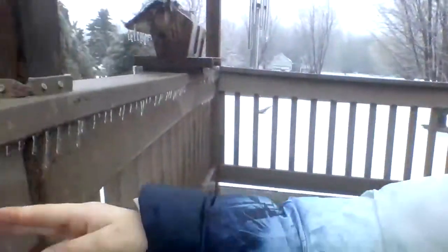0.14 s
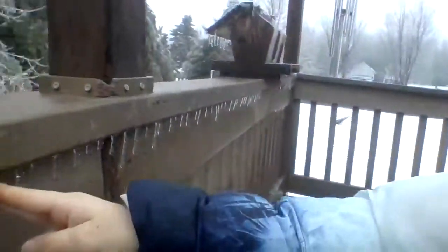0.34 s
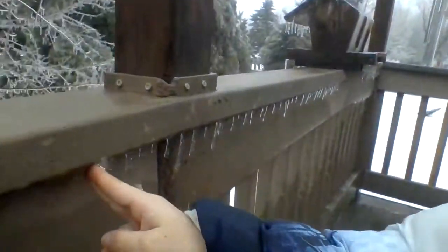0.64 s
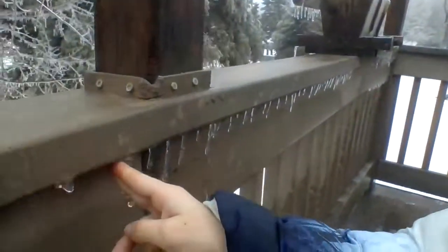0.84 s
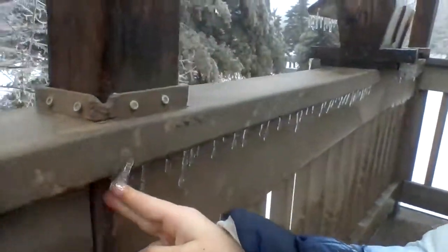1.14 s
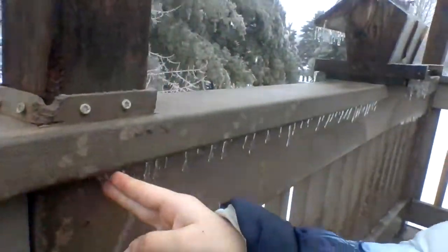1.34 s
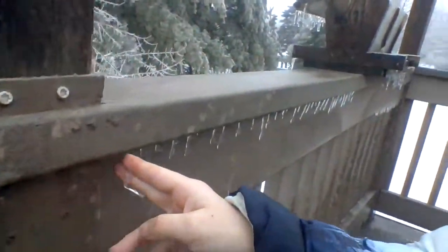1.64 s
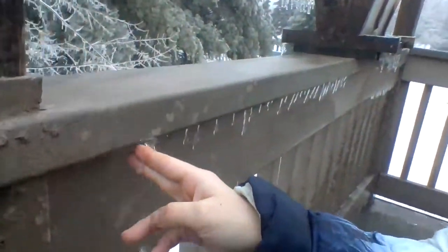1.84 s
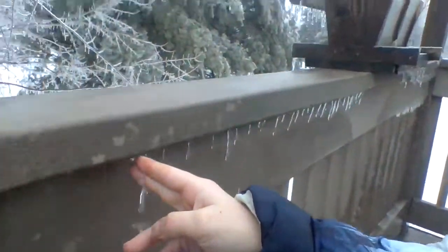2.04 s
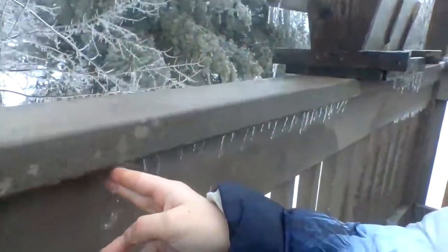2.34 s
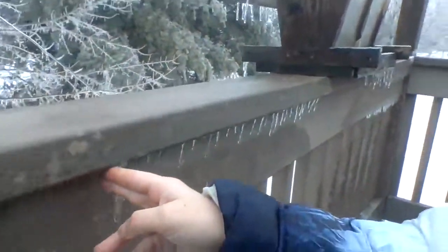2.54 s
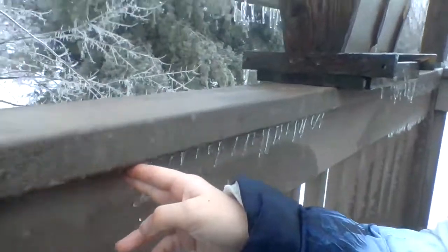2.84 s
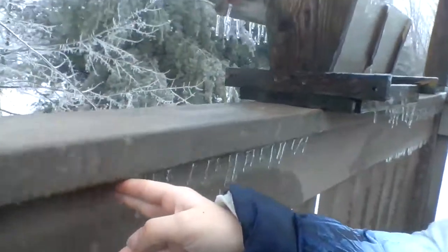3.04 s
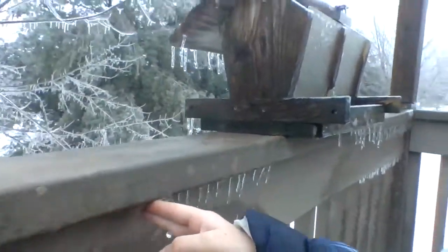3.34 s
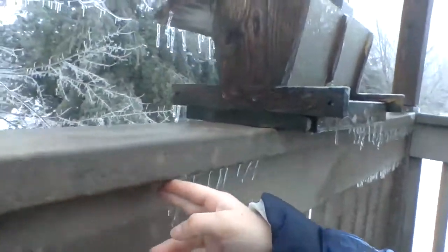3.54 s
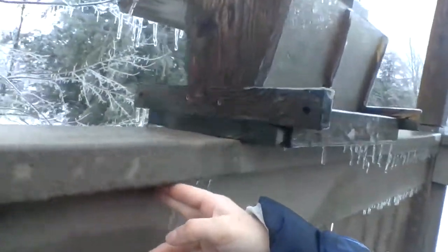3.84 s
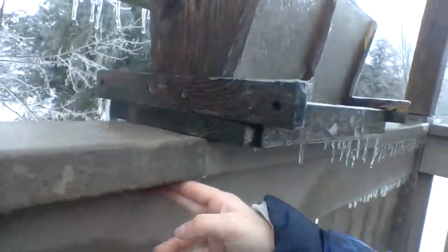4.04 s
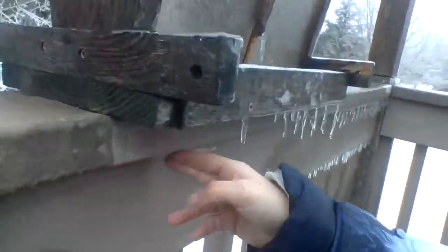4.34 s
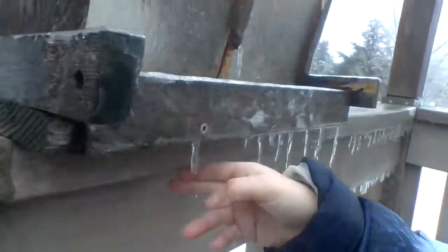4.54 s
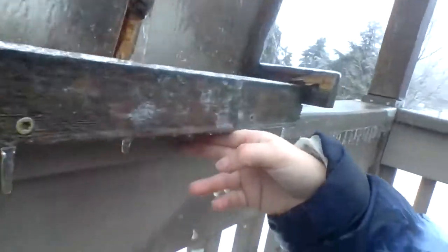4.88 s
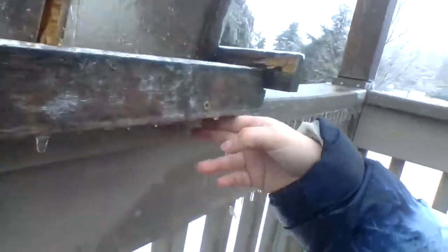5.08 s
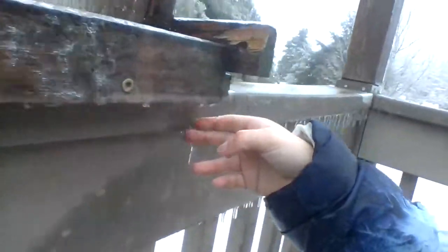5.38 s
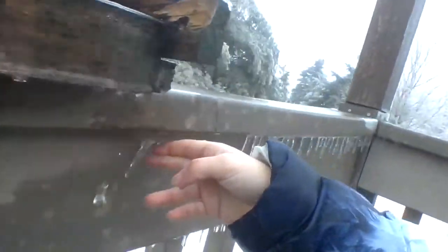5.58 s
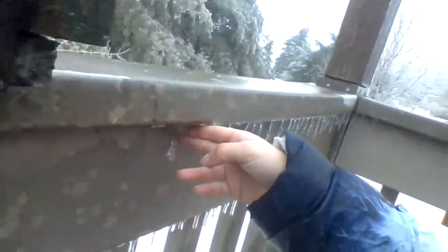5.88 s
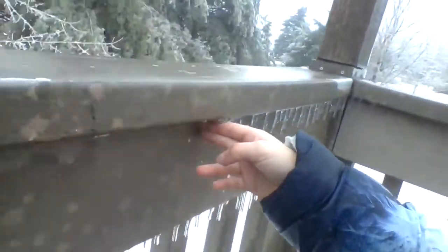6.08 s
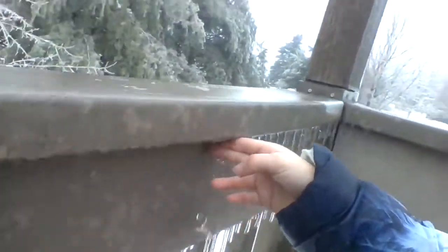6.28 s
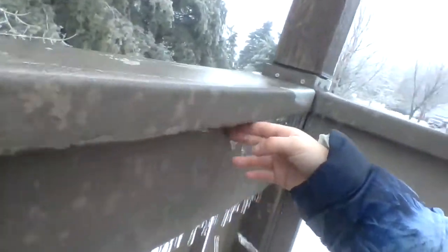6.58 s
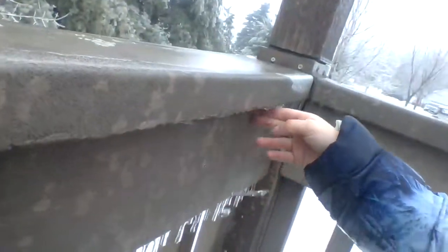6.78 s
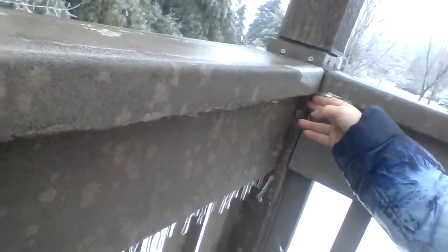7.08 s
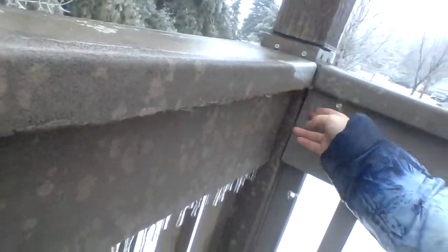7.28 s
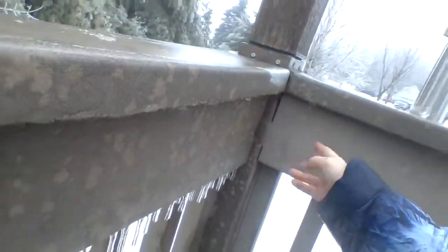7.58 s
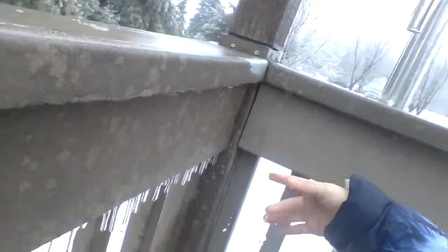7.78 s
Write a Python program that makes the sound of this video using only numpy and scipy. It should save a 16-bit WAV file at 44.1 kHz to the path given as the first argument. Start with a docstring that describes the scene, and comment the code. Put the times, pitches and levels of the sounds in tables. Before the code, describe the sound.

Close outdoors on a wooden deck, fingers slide under a rail, snapping thin icicles. Sharp glassy clicks and tiny ticks come irregularly over crinkly ice crackle, with dull wood knocks and low footstep thumps. After six seconds a heavy bump hits the handheld microphone and the cracking turns dense and loud, then thins out over faint airy hiss.

```python
"""A hand slides under a wooden deck rail and snaps off small icicles, over a faint winter hiss.
From the start the hand-held phone sways, crumbs crackle under the finger, and ice cracks, ticks and knocks
the rail; the walker's steps thump the deck boards. At 6.32 s the phone itself is knocked.
Ice, rail and boards are struck resonances; rub, air and sway are coloured noise.
The phone's one microphone rings near 8 kHz and clips on the hardest blows."""
import sys
import numpy as np
from scipy import signal
from scipy.fft import rfft, irfft, next_fast_len
from scipy.io import wavfile
from scipy.ndimage import uniform_filter1d, map_coordinates

SR = 44100
rng = np.random.default_rng(int(sys.argv[2]) if len(sys.argv) > 2 else 0)


def to_wav(s):
    """Save 16-bit WAV."""
    ch = np.atleast_2d(s).T  # columns
    pcm = np.round(np.clip(ch, -1, 1) * 32767)  # PCM
    wavfile.write(sys.argv[1], SR, pcm.astype(np.int16))


def convert_level_to_amplitude(level_db):
    """Map a level in decibels to its linear amplitude factor."""
    exponent = np.asarray(level_db, float) / 20
    return 10 ** exponent


N = 349104

# Finger pressing along the icy wood. Each row: time in seconds, relative rustle level in dB.
FINGER_PRESS = [(0, -50), (.15, -36), (.235, -37), (.3, -58.5), (.62, -56.5), (.8, -42.5), (1.05, -46),
                (1.28, -51), (1.3, -34.5), (1.345, -38.5), (1.4, -47), (1.425, -41), (1.5, -46),
                (2.05, -49.5), (2.7, -41.5), (2.95, -41.5), (3.12, -47), (3.17, -41), (3.34, -46),
                (3.6, -34.5), (3.9, -43.5), (4.5, -43.5), (4.65, -46.5), (4.78, -41), (4.87, -51.5),
                (4.94, -41), (5.06, -52), (5.2, -51.5), (5.36, -39.5), (5.62, -52), (5.7, -34), (6.28, -38),
                (6.36, -29.5), (6.8, -31.5), (6.9, -34), (6.94, -29), (7.01, -39), (7.09, -33.5),
                (7.165, -32.5), (7.215, -42.5), (7.28, -41), (7.42, -38), (7.6, -43.5), (7.76, -45),
                (7.92, -48.5)]


def unit(x):
    """Scaled to rms 1."""
    return x / np.sqrt(np.mean(x ** 2) + 1e-20)


def peak(x):
    """Scaled to a peak of 1."""
    return x / np.abs(x).max(axis=-1, keepdims=True)


def along(points, hz):
    """Interpolates (Hz, value) points on a log frequency axis."""
    point_hz, value = np.transpose(points)
    return np.interp(np.log(hz + .1), np.log(point_hz), value)


def curve(rows):
    """(seconds, value) rows as one value per sample."""
    s, value = np.transpose(rows)
    return np.interp(np.arange(N) / SR, s, value)


def wobble(rate_hz):
    """A smooth random curve, rate_hz knots a second, at most 60."""
    knots = rng.standard_normal(int(N * 60 / SR) + 4)
    return map_coordinates(knots, [np.arange(N) * min(rate_hz, 60) / SR])


def filtered(x, response):
    """x times a complex response of frequency."""
    n = x.shape[-1]
    m = next_fast_len(2 * n)
    return irfft(rfft(x, m) * response(np.fft.rfftfreq(m, 1 / SR)), m)[..., :n]


def resonance(f, hz, width_hz):
    """One causal resonance, gain 1 at its centre."""
    return 1j * f * width_hz / (hz * hz - f * f + 1j * f * width_hz)


def coloured(x, spectrum):
    """x filtered by the (Hz, dB) points, rms 1."""
    return unit(filtered(x, lambda hz: convert_level_to_amplitude(along(spectrum, hz))))


def patchy(x, patchy_db):
    """x with random patches of gain over time and frequency."""
    z = signal.stft(x, nperseg=256)[2]
    field = uniform_filter1d(rng.standard_normal(z.shape), size=10, axis=0)
    field = uniform_filter1d(field, size=5, axis=1)
    return signal.istft(z * convert_level_to_amplitude(patchy_db * unit(field)), nperseg=256)[1][:N]


def sway():
    """Slow pressure swings from the phone moving in the hand: noise mostly under 15 Hz, evened in level."""
    # Each row: time in seconds, level in dB.
    sway_level = [(0, -22), (.35, -14), (1.15, -28), (1.45, -16), (2.4, -28), (2.65, -13), (3.05, -22),
                  (3.5, -13), (3.85, -23), (4.27, -15), (4.95, -26), (6.3, -22), (6.8, -34), (7.92, -39)]
    # Each row: frequency in Hz, relative level in dB.
    swing_colour = [(1, -40), (3, 0), (7, 0), (15, -10), (30, -24), (60, -45)]
    swing = coloured(rng.standard_normal(N), swing_colour)
    power = uniform_filter1d(uniform_filter1d(swing ** 2, size=9000), size=9000)
    steady = swing / np.sqrt(np.abs(power) + .08)  # the arm keeps its stroke
    return convert_level_to_amplitude(curve(sway_level)) * steady


def hiss():
    """Hiss of air and microphone: patchy coloured noise."""
    # Each row: frequency in Hz, relative level in dB.
    air_colour = [(20, -36), (40, -15), (90, -9), (600, -17), (1500, -17.5), (4500, -80), (6200, -24.5),
                  (7000, -8), (8700, -1), (9700, -16.5), (11000, -11), (16000, -31)]
    rms_db = -28.5
    return convert_level_to_amplitude(rms_db) * coloured(patchy(rng.standard_normal(N), patchy_db=5.0), air_colour)


def slide():
    """Ice crumbs crackle under the finger: grains of uneven size over a patchy rub."""
    # Bright crackle. Each row: frequency in Hz, relative level in dB.
    rustle_colour = [(1500, -25), (2300, -2.5), (4000, 0), (6300, 7.5), (8300, 8), (11000, 1), (16000, -5)]
    # Dull rub. Each row: frequency in Hz, relative level in dB.
    scuff_colour = [(200, -45), (450, 0), (1200, -2), (2500, -4), (4000, -40)]
    stutter_db = 1.86  # uneven grip
    scuff_db, scuff_db_per_db = -40, 1  # at a -42 dB rustle, and its growth

    rustle_db = curve(FINGER_PRESS) + stutter_db * wobble(8)
    chance, size = rng.random((2, N)), rng.random((2, N))
    crumbs = (chance < 220 / SR) * convert_level_to_amplitude(18 * size)  # 220 a second in each of two streams
    decay = np.exp(-np.arange(256) / (SR * 0.004))
    grain = unit(signal.fftconvolve(crumbs, decay[None], axes=1)[:, :N])
    flicker = convert_level_to_amplitude(3 * wobble(45))

    bright_rub = flicker * (1 + 1.7 * grain[0]) * rng.standard_normal(N)
    bright = coloured(patchy(bright_rub, patchy_db=2.4), rustle_colour)
    dull_rub = flicker * (1 + 0.051 * grain[0] + 0.18 * grain[1]) * rng.standard_normal(N)
    dull = coloured(patchy(dull_rub, patchy_db=-2.0), scuff_colour)
    dull_db = scuff_db + scuff_db_per_db * (rustle_db + 42.0)
    return convert_level_to_amplitude(rustle_db + 15.0) * bright + convert_level_to_amplitude(dull_db) * dull


def chips(count=120):
    """Small chips break at random, more often and harder where the finger presses: rows as in snaps()."""
    over_rustle_db, scatter_db = 17, 6
    centre_hz, scatter_octaves = 5300, 1
    knock_db, knock_scatter_db = -10, 5
    rustle_db = curve(FINGER_PRESS)
    share = np.cumsum(convert_level_to_amplitude(0.32 * rustle_db))
    when = rng.random(count)
    size, pitch, knock = rng.standard_normal((3, count))
    at = np.searchsorted(share, when * share[-1]).clip(0, N - 1)
    level_db = rustle_db[at] + over_rustle_db + scatter_db * size
    hz = np.clip(centre_hz * 2 ** (scatter_octaves * pitch), 2500, 11000)
    return np.transpose([at / SR, level_db, hz, knock_db + knock_scatter_db * knock])


def snaps():
    """A break is a burst of tiny fractures: it rings the ice and the microphone port, and knocks the rail."""
    # Icicles breaking or striking wood. Each row: start in seconds, relative level in dB,
    # ring in Hz, rail knock over the ice ring in dB.
    icicles = [(0.0562, 8.5, 8370, -43), (0.1688, 11.5, 7600, -26), (0.385, -44, 1980, -12),
               (0.5475, -17.5, 8100, -18), (0.5815, -39, 6000, -11), (0.604, -25, 4530, -15),
               (0.7975, -18, 8050, -5.5), (0.9122, -18, 7200, -5), (0.9486, -18.5, 5800, -1),
               (0.978, -22, 5040, 1), (1.08, -9.5, 10400, -32), (1.1512, -12.5, 3730, -11),
               (1.195, 10.5, 8200, -53), (1.2173, -14, 5360, -11), (1.2948, -5, 5500, -35),
               (1.2965, -6, 6700, -16), (1.3163, -8.5, 5560, -6.5), (1.4146, 8, 8000, -24),
               (1.4215, -10, 5000, -19), (1.451, -20, 3080, -9), (1.555, -6.5, 6630, -15.5),
               (1.681, -8, 5630, -18), (1.701, -5.5, 5700, -5.5), (1.7556, -2, 11100, -43),
               (1.784, -11, 5500, -14), (1.9073, -7, 5530, -26), (2.0948, -14, 9000, -30),
               (2.1244, 8, 7750, -31), (2.1911, -16, 7480, -7), (2.214, -10.5, 5250, -14),
               (2.2213, -13.5, 3270, -17), (2.393, -6.5, 6300, -33), (2.4798, -11.5, 7600, -8),
               (2.5722, -0.5, 7360, -39), (2.5797, -2, 7760, -15), (2.707, -6, 5400, -10),
               (2.7484, 1.5, 8400, -45), (2.7722, -11, 7900, -17), (2.806, -15, 8830, 4.5),
               (2.8259, -13, 5730, -28), (2.8665, -15, 7880, -26), (2.9435, -5.5, 5900, -8.5),
               (3.032, -13.5, 3500, -11), (3.1434, -11, 4670, -6.5), (3.147, -8, 6100, -6),
               (3.166, -23, 5000, -2), (3.2028, -17, 8540, -25), (3.2406, -8, 6500, -14.5),
               (3.2851, -15, 7100, -21), (3.3647, -13.5, 9900, -34), (3.3945, -7, 8300, -26),
               (3.4387, -16.5, 7000, -20), (3.4702, -15, 10100, -29), (3.512, -11.5, 8600, -15.5),
               (3.549, -10, 7960, -11), (3.578, -19, 4000, 0), (3.6243, -11.5, 8700, -7),
               (3.6752, -10.5, 8750, -15), (3.7001, -16, 5030, -16), (3.7382, -12, 7800, -0.5),
               (3.8078, -12.5, 8250, -6.5), (3.9155, 4.5, 8000, -49), (3.9257, -5.5, 8200, -5.5),
               (4.026, -12, 3400, -7), (4.0359, -5.5, 8560, -7), (4.1165, -6.5, 7800, -17),
               (4.22, -14, 8900, -30), (4.3398, -9, 7200, -14), (4.513, -10.5, 7600, -9),
               (4.445, -20, 2500, 0), (4.6834, -13.5, 8000, -9), (4.719, -12.5, 4500, -1.5),
               (4.733, -21, 2500, 8), (4.746, -18, 3950, -2), (4.7807, -12, 8300, -9),
               (4.809, -25.5, 2500, 7), (4.836, -14, 5700, -19), (4.848, -17.5, 3880, -8),
               (4.8914, -7, 6900, -37), (4.9224, -23, 8200, -22), (4.9292, -8, 5400, -4),
               (5.0176, -16.5, 8600, 7), (5.123, -10.5, 3000, -11.5), (5.1667, -4, 6140, -14),
               (5.2015, -1.5, 7900, -32), (5.2036, 1.5, 4500, -4.5), (5.2045, 9, 2030, -17),
               (5.2113, 1, 2680, -10), (5.212, -13, 5870, -24), (5.2741, -16, 6800, -15),
               (5.323, -14, 8690, -13), (5.337, -14.5, 5300, -1), (5.3938, -13.5, 7920, -3.5),
               (5.48, -11, 9600, -36), (5.5645, -8, 5360, -9), (5.6318, -16, 8400, -3.5),
               (5.812, -28, 2200, 2), (5.819, -20, 2400, 9), (5.826, -20, 2600, 0), (5.89, -30, 2170, -5),
               (5.9208, 7.5, 8050, -42), (5.9235, 6, 8000, -47), (5.9645, -9, 9500, -8),
               (6.0056, -6, 6600, -9), (6.0932, -7, 9100, -10.5), (6.1225, -4.5, 6950, -10),
               (6.139, -10, 3500, 1), (6.1786, -6, 8000, -12), (6.2057, -4.5, 8700, -12),
               (6.2189, -11, 7700, -1), (6.2551, -6, 6100, -15), (6.2977, -12, 3840, -5),
               (6.32, -1, 2360, -24), (6.3281, 10.5, 8000, -8.5), (6.352, 7.5, 8040, -27),
               (6.3715, 0, 7900, -39), (6.3962, -6, 8400, -22), (6.4451, -10, 3890, -11),
               (6.467, -8, 3890, -6), (6.494, -10, 4000, -14), (6.5012, -2.5, 8100, -7.5),
               (6.5234, -2, 6000, -9), (6.532, -2, 8000, -5), (6.5426, -7.5, 8350, -3),
               (6.5564, 0, 7700, -6), (6.559, 3.5, 6160, -14), (6.5798, -3, 7040, -8),
               (6.594, 1, 7960, -15), (6.6089, -2, 7950, -10), (6.617, -5, 10000, -25),
               (6.6253, -6, 8900, -30), (6.6474, -1, 8440, -28), (6.663, -4.5, 8240, -13),
               (6.68, -2, 8200, -15), (6.6994, -4, 3800, -4), (6.7321, 1.5, 8200, -5.5),
               (6.7574, -11.5, 8060, -1), (6.7856, -7, 5730, -6), (6.8037, -6, 3150, -15),
               (6.8342, -4.5, 2940, -8.5), (6.8225, -13.5, 4000, 0), (6.8425, -16, 5000, 0),
               (6.8521, -8.5, 4680, -2), (6.867, -4, 6000, -8.5), (6.889, -5, 10400, -5),
               (6.9292, -4, 9500, -18), (6.9398, 4.5, 5800, -14), (6.9485, 2, 8100, -16),
               (6.9525, -0.5, 3530, -11), (6.9552, 1, 4600, -18), (6.9692, -2.5, 5830, -21),
               (6.9827, 6, 4430, -24), (7.0045, -29, 3500, 0), (7.0243, -5, 9700, -9),
               (7.0275, -9, 6040, -20), (7.0315, -7.5, 5000, -4.5), (7.0365, -18, 5000, -21),
               (7.0615, -1.5, 9350, -12), (7.0655, -3, 9400, -11), (7.075, -29, 11000, -18),
               (7.086, -6, 5070, -15), (7.096, -8, 3700, -29), (7.111, 0, 9300, -28),
               (7.122, -13, 9500, -27), (7.132, 0.5, 8600, -11.5), (7.1403, -7, 8900, -6),
               (7.161, -1.5, 3600, -33), (7.163, -7, 7000, -9), (7.3093, -14.5, 9350, -12),
               (7.3181, -10, 9150, -6.5), (7.37, 6.5, 7900, -34), (7.3767, -1, 7750, -12.5),
               (7.4194, -12.5, 5800, -2.5), (7.4608, -9, 7400, -8), (7.5451, -9.5, 7200, -6.5),
               (7.6266, -6, 7840, -16), (7.66, -22.5, 2700, 3), (7.682, -16, 4000, -4),
               (7.7112, -4, 7300, -17), (7.751, -19.5, 3740, -25)]
    # The rail's modes. Each row: frequency in Hz, width in Hz, mean level in dB.
    rail_modes = [(1065, 106, -5), (1460, 110, 1.5), (1806, 360, -9.5), (2580, 320, 3.5), (3600, 900, 4),
                  (4500, 470, -21.5)]
    rail_scatter_db = 4  # each blow lands elsewhere and stirs the modes differently
    icicle_t60_s, chip_t60_s, t60_scatter = 0.032, 0.0088, 0.26  # before the 2-18 ms limits below
    shorter_per_db = 0.15  # above -6.5 dB

    s, db, hz, knock_db = np.vstack([icicles, chips()]).T[:, :, None]
    count = len(s)
    is_icicle = np.arange(count)[:, None] < len(icicles)
    t = np.arange(4096) / SR

    hard_t60 = icicle_t60_s * np.exp(-shorter_per_db * np.clip(db + 6.5, 0, None))
    t60 = np.where(is_icicle, hard_t60, chip_t60_s) * np.exp(t60_scatter * rng.standard_normal(s.shape))
    crack = convert_level_to_amplitude(-60 * t / np.clip(t60, .002, .018)) * (1 - np.exp(-t / 0.000067))
    burst = rng.standard_normal((count, 2, len(t))) * crack[:, None]
    burst[..., 0] += 2.5  # the first fracture is one sharp step

    # lesser modes: every piece has its own shape
    lesser_hz = hz[..., None] * 2 ** rng.uniform(-1, .5, (count, 1, 3))
    ring_width_hz = np.where(is_icicle, 0.31, 0.7) * hz

    def ice(f):
        main = resonance(f, hz, ring_width_hz) ** 2
        lesser = resonance(f[:, None], lesser_hz, 0.28 * lesser_hz).sum(-1)
        port = convert_level_to_amplitude(-5.5) * resonance(f, 8350, 1300)
        direct = convert_level_to_amplitude(-18.0 - 8.0 * np.log2(hz / 4000))
        return main + convert_level_to_amplitude(0.83 * knock_db - 3.5) * lesser + port + direct

    bright = peak(filtered(burst[:, 0], ice))

    # splinters scatter just after the break, less after a clean one
    ragged = convert_level_to_amplitude(9.4 * np.sin(2 * np.pi * (140 * t + rng.random((count, 1)))))
    debris = ragged * convert_level_to_amplitude(-19 - 2.1 * np.clip(db + 1.5, 0, None) - 60 * t / 0.093)
    scatter = filtered(rng.standard_normal(debris.shape), lambda f: resonance(f, 7500, 9500))
    splinters = debris * unit(scatter)

    mode_hz, width_hz, mode_db = np.transpose(rail_modes)
    mode_db = mode_db + rail_scatter_db * rng.standard_normal((count, len(mode_hz)))
    stirred = convert_level_to_amplitude(mode_db) * (-1) ** np.arange(len(mode_hz))

    def wood(f):
        modes = stirred @ resonance(f, mode_hz[:, None], width_hz[:, None])
        return modes + 0.9 * resonance(f, 900, 2200)

    rail = peak(filtered(burst[:, 1], wood))
    sound = convert_level_to_amplitude(db + 6.0) * (bright + splinters + convert_level_to_amplitude(knock_db) * rail)
    at = np.round(s * SR).astype(int) + np.arange(len(t))
    return np.bincount(at.ravel(), sound.ravel(), N + SR)[:N]


def steps():
    """A footfall rings the boards; it lands on a new spot each time, so pitches and strengths shift."""
    # Footfalls and bumps. Each row: start in seconds, level in dB, drive of the modes under 60 Hz in dB,
    # relative clatter level in dB.
    footfalls = [(0.072, -30.5, -25.5, 4.5), (0.115, -14.5, -11, -17), (0.176, -27.5, 2, -2.5),
                 (0.699, -23, -2, -16), (1.412, -30, -20, 7.5), (1.503, -17.5, -4.5, -9),
                 (1.942, -18, 0.5, -24), (2.389, -18.5, 0, -4), (2.755, -16, -3, -29),
                 (3.189, -21, 3.5, -13), (3.526, -26, 6, -22), (4.023, -24, 4, -19), (4.059, -24, -5, 1.5),
                 (4.46, -24, 0, -12), (4.928, -18, 0, -10), (5.2, -8.5, -36, -27), (5.357, -20.5, 0, -17),
                 (5.798, -25, 8.5, 2.5), (5.838, -26, -7, -19), (5.918, -27.5, -21, -14),
                 (6.116, -19, -4, -34), (7.37, -28, 5, -20)]
    # Deck board modes. Each row: mean frequency in Hz, relative level in dB, t60 in seconds.
    deck_modes = [(31, -22, 0.11), (48.5, -4, 0.89), (77, -11.5, 0.23), (124.6, 3, 0.11), (179.5, -4, 0.14),
                  (263, 8.5, 0.042), (383, -12, 0.14)]
    out, t = np.zeros(N + SR), np.arange(SR) / SR
    hz, level_db, t60 = np.transpose(deck_modes)[:, :, None]
    for s, db, boom_db, clatter_db in footfalls:
        shift, change, turn = rng.standard_normal((3, len(hz), 1))
        drive_db = np.where(hz < 60, boom_db, 0)
        # struck together, loose boards then waver
        waver = 0.13 * np.sin(2 * np.pi * (0.384 * hz * t + change))
        cycles = hz * (1 + .05 * shift) * t + 0.6 + 0.2 * turn + waver
        rise = (1 - np.exp(-t * hz / 0.36)) ** 2  # low modes take longer to build up
        decay = convert_level_to_amplitude(level_db + drive_db + 1.3 * change - 60 * t / t60)
        boards = (rise * decay * np.sin(2 * np.pi * cycles)).sum(0)
        # the sole clatters as it settles
        rattle = (1 - np.exp(-t / 0.0016)) * convert_level_to_amplitude(0.47 * np.cos(2 * np.pi * 95 * t) - 60 * t / 0.075)
        noise = filtered(rng.standard_normal(SR), lambda f: resonance(f, 830, 750) ** 2)
        clatter = rattle * unit(noise)
        out[round(s * SR):][:SR] += convert_level_to_amplitude(db) * (boards + convert_level_to_amplitude(clatter_db + 6.5) * clatter)
    return out[:N]


def bump(start_s=6.32, db=-5.3, start_hz=310, end_hz=27, fall_s=0.00492, hold_s=0.052, t60_s=0.17):
    """The phone itself is knocked: one heavy swing whose pitch drops fast as the hand damps it."""
    t = np.clip(np.arange(N) / SR - start_s, 0, None)
    cycles = end_hz * t + (start_hz - end_hz) * fall_s * (1 - np.exp(-t / fall_s))
    level = convert_level_to_amplitude(db - 60 * np.clip(t - hold_s, 0, None) / t60_s)
    onset = (1 + 2.2 * np.exp(-t / 0.023)) * (1 - np.exp(-t / 0.0013))
    return -level * onset * np.sin(2 * np.pi * cycles)


def scene():
    """One microphone hears everything."""
    mono = sway() + hiss() + slide() + snaps() + steps() + bump()
    return np.tile(mono, (2, 1))


def roll_off(x):
    """The treble ends steeply here."""
    return signal.sosfilt(signal.butter(12, 16430, fs=SR, output="sos"), x)


def record(dry):
    """The port dulls the top and the input clips; left and right differ only in faint, flickering patches."""
    # Microphone treble loss. Each row: frequency in Hz, gain in dB.
    port_gain = [(20, 2), (9000, -14), (11000, -16.5), (13500, -19), (15700, -23.5), (16300, -49)]
    # Each row: frequency in Hz, side minus mid inside a patch in dB.
    side_level = [(25, -33), (200, -23), (1500, -19), (4000, -11), (14000, -2)]
    mid = filtered(dry[0], lambda hz: convert_level_to_amplitude(along(port_gain, hz)))
    mid = mid / (1 + np.abs(mid / .98) ** 12) ** (1 / 12)

    hz, t, z = signal.stft(mid, SR, nperseg=1024)
    moments = unit(uniform_filter1d(rng.standard_normal(len(t)), size=4))
    spots = uniform_filter1d(rng.standard_normal(z.shape), size=20, axis=0)
    spots = unit(uniform_filter1d(spots, size=4, axis=1))
    patches = (moments + .6 * spots > 1.15) * convert_level_to_amplitude(along(side_level, hz))[:, None]
    random_phase = np.exp(2j * np.pi * rng.random(z.shape))
    side = signal.istft(z * patches * random_phase, SR, nperseg=1024)[1][:N]
    return roll_off(np.array([mid + side, mid - side]))


dry = scene()
out = record(dry)
to_wav(out)
```